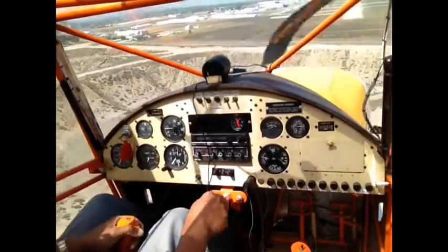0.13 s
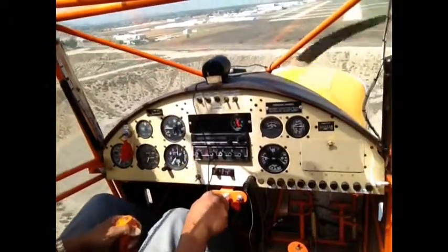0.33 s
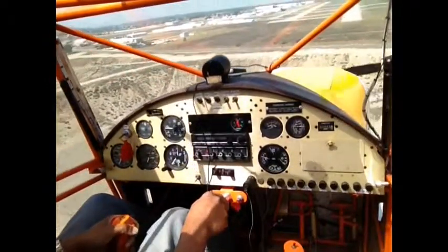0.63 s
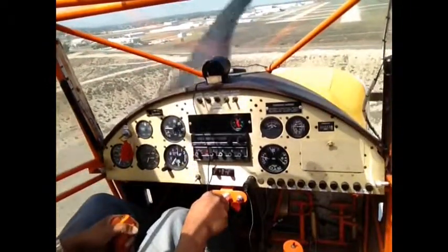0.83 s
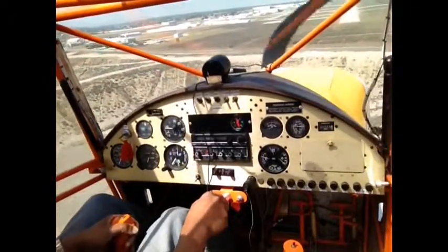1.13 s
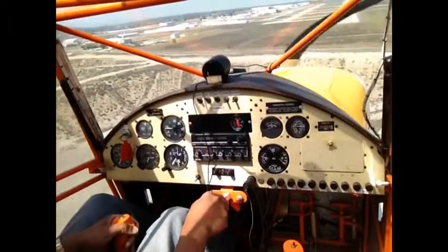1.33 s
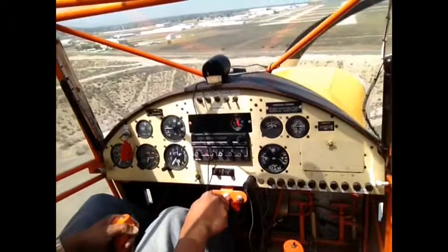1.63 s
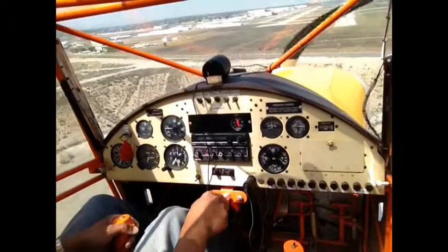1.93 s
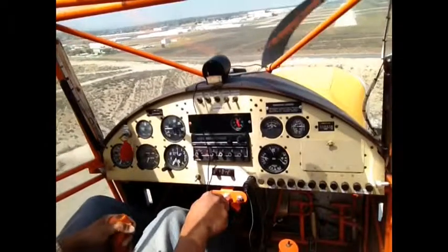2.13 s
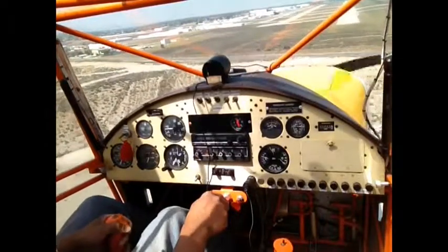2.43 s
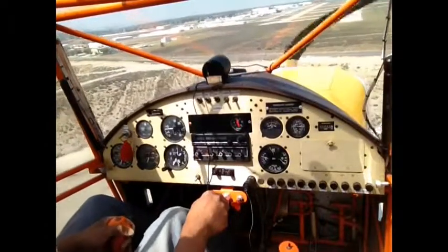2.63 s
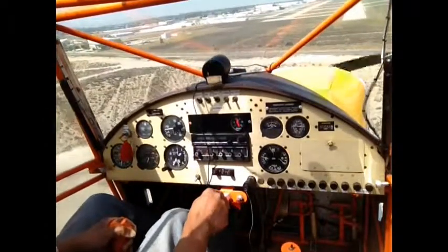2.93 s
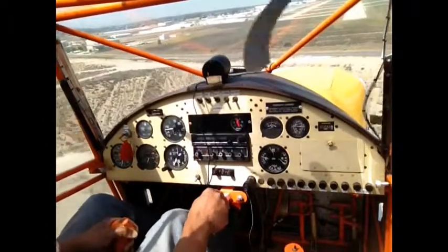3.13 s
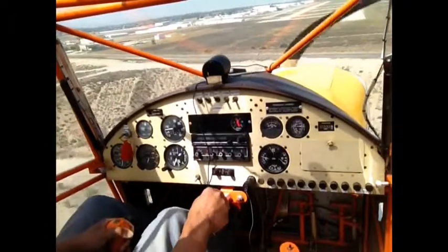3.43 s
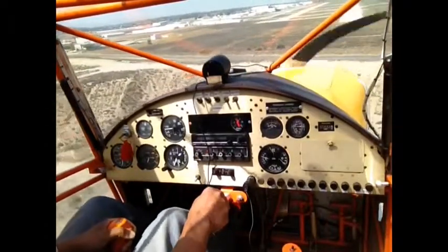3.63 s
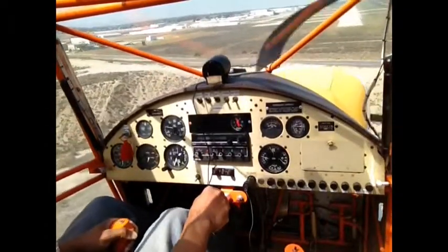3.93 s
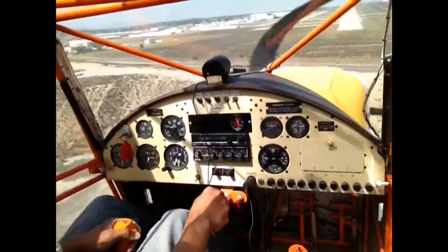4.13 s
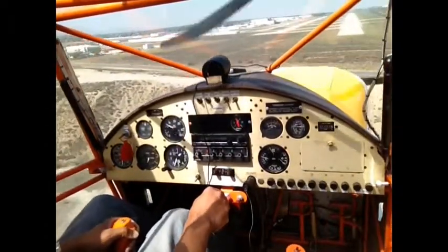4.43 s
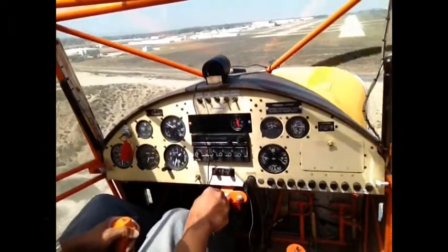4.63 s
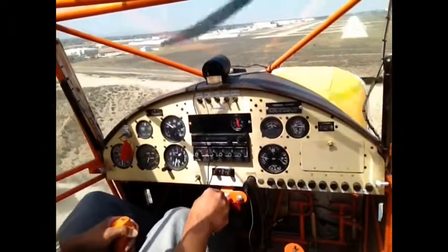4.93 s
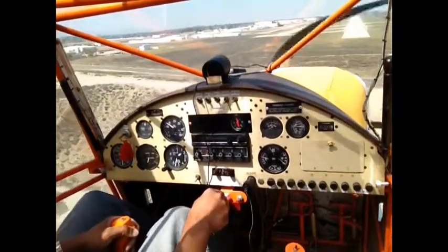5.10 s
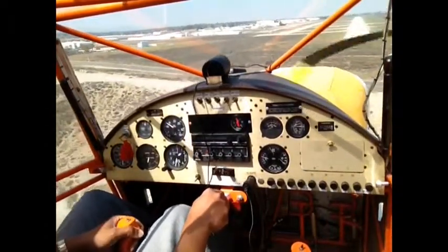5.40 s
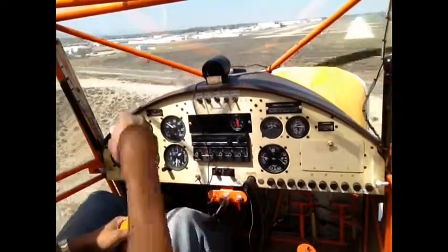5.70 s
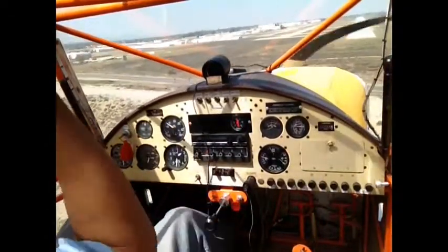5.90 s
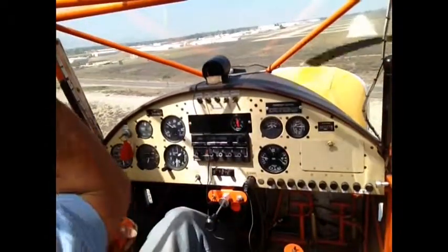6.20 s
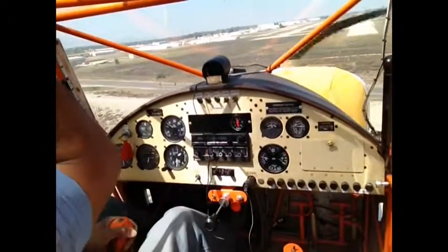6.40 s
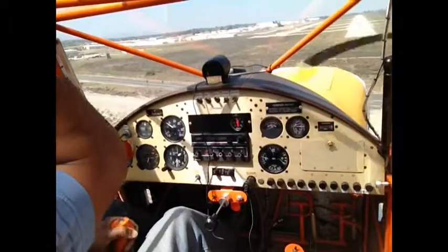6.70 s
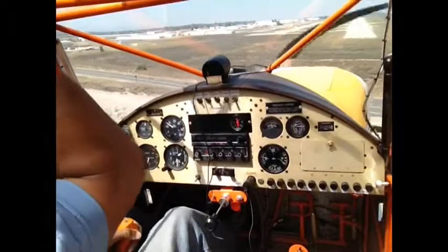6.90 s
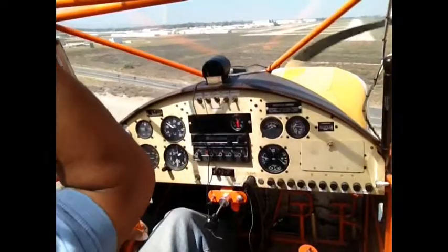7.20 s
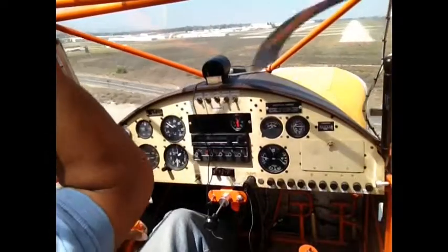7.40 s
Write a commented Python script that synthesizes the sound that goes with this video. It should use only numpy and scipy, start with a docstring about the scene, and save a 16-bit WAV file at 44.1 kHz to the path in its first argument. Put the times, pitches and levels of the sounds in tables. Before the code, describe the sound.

Inside a small propeller plane on approach, uneven idle and rushing air give way to higher engine drone, choppy dropouts and hard slapping knocks.

```python
"""Light aircraft cockpit on approach

The engine idles, then picks up to low power; firing tones (sines) and exhaust roar (pulsed noise) follow the shaft.
Air past the cabin (coloured noise) makes panels boom and hiss; wandering narrow bands whistle and sing.
Under power the propeller wash rumbles on the microphone. The sound drops out briefly, mostly under power;
short pulses with bright noise bursts slap, twice in a cluster that knocks, and the recorder's low cut rings after each.
"""
import sys
import numpy as np
from scipy import signal
from scipy.fft import rfft, irfft, next_fast_len
from scipy.io import wavfile
from scipy.ndimage import map_coordinates

SR = 44100
rng = np.random.default_rng(int(sys.argv[2]) if len(sys.argv) > 2 else 0)


def unload_audio(sound):
    """Save the sound as a 16-bit wav file, at the path given as the first command line argument."""
    columns = np.transpose(np.atleast_2d(sound))
    # keep every value between -1 and 1, then stretch to whole-number steps
    steps = np.round(np.clip(columns, -1, 1) * 32767)
    wavfile.write(sys.argv[1], SR, steps.astype(np.int16))


N = 332955

# Engine speed: time_s, shaft_turns_per_s
SPEED = [(0, 30.6), (.75, 31.3), (2, 29.3), (2.6, 27.6), (3.5, 27.7), (3.9, 36.5), (4.25, 41.7),
         (4.55, 43.5), (5.1, 44.3), (5.7, 43.7), (7.1, 43.8), (7.55, 43.4)]
# Engine tones; half orders since a four-stroke cycle lasts two turns:
# shaft_rate_multiple, idle_level_db, power_level_db (re FIRING)
ORDERS = [(2, -8, 0.5), (2.5, -41, -5.5), (3, 5.5, 0.5), (3.5, -17, -20.5), (4, -5.5, -27), (4.5, -6, -14),
          (5, -11.5, -23)]
# Engine tone strength, uneven at idle, firm under power: time_s, level_db
FIRING = [(0, -36), (.35, -32.5), (.5, -37), (.88, -43), (1.1, -32.5), (1.5, -33.5), (1.68, -28.5),
          (1.9, -35), (2.6, -34), (3.0, -37.5), (3.5, -33.5), (3.75, -35.5), (4.1, -28.5), (4.6, -24.5),
          (5.05, -25), (5.7, -25.5), (6.6, -26), (7.0, -23.5), (7.25, -24), (7.55, -27.5)]
# Exhaust roar spectrum: freq_hz, density_db
EXHAUST = [(60, -46), (100, -10.5), (122, 1), (150, -2), (190, -3), (228, -4.5), (280, -16.5), (340, -12.5),
           (450, -32), (900, -68)]
# Low roar swells: centre_s, half_length_s, gain_db
SWELLS = [(0.388, .05, 5), (.62, 0.24, 5.5), (1.3, .11, 6), (1.518, 0.057, 4.5), (1.806, .08, 5),
          (2.035, .04, 4), (2.23, 0.044, 11.5), (2.78, 0.065, 6.5), (3.97, 0.056, 4), (4.25, .04, 1.5),
          (4.443, 0.081, 2.5), (4.593, .05, 3), (4.812, 0.014, 7.5), (4.86, 0.011, 4), (4.93, 0.023, 5),
          (5.02, 0.019, 2), (5.113, .015, 3.5), (5.19, .03, 2), (5.303, .025, 5.5), (5.477, 0.03, 7),
          (5.697, .03, 1), (6.83, .025, 1), (7.055, 0.023, 4), (7.275, 0.018, 7.5), (7.393, 0.018, 2),
          (7.45, 0.028, 4.5)]
# Airflow strength past the cabin: time_s, level_db
AIRFLOW = [(0, -47), (0.65, -47), (1.6, -48.5), (2.2, -48.5), (3.0, -49.5), (3.75, -48.5), (4.5, -47),
           (4.8, -46.5), (4.93, -46.5), (5.03, -46.5), (5.7, -48), (7.55, -47.5)]
# Cabin noise spectra, frame rumble, panel boom, air rush, hiss: freq_hz, density_db
AIRFRAME = [(20, -22), (40, 4.5), (62, -5), (85, 2), (115, -2), (160, -8), (230, -25.5), (500, -52)]
BOOM = [(150, -7), (270, -7.5), (335, -1.5), (410, -4), (465, 1), (500, -0.5), (550, -4), (630, -9),
        (730, -10), (830, -16), (1000, -18.5), (1400, -35.5), (3000, -75)]
RUSH = [(500, -25), (950, -0.5), (1250, 0.5), (1550, 1.5), (1800, -1), (2050, -1.5), (2350, -5),
        (2650, -3.5), (2950, -7.5), (3400, -10.5), (4000, -15), (4500, -20), (7000, -48)]
HISS = [(2240, -47), (3800, -1.5), (4140, -1.5), (4320, -6.5), (4930, 0), (6110, -3), (8300, 0),
        (9100, -0.5), (10800, 3), (13400, -4.5), (15200, -12)]
# Narrow cabin rings: idle_hz, power_hz, width_hz, idle_level_db, power_level_db (re airflow)
RINGS = [(499, 490, 42, 4.5, -0.5), (628, 620, 70, -1.5, -8)]
# Thin air whistle around the cabin: time_s, pitch_hz, level_db
WHISTLE = [(0, 2680, -62), (.25, 2630, -56), (.75, 2636, -55.5), (1.1, 2620, -59), (1.5, 2640, -68),
           (1.95, 2660, -69), (2.2, 2666, -59), (3.0, 2685, -64), (3.45, 2680, -65), (3.7, 2670, -61),
           (4.0, 2650, -65), (4.5, 2645, -58.5), (5.2, 2624, -58), (6.05, 2624, -68), (7.55, 2645, -63)]
# Lower, broader airflow ring: time_s, level_db
SING = [(0, -64), (.65, -53), (1.1, -58), (1.45, -56), (1.7, -66), (2.3, -57), (2.6, -58), (3.9, -60),
        (4.45, -57), (5.4, -64), (6.2, -53), (6.7, -58), (7.55, -64)]
# Wash rumble spectrum: freq_hz, density_db
WASH = [(130, 2), (200, -3), (250, 2.5), (340, -7.5), (450, -13.5), (600, -15.5), (800, -19.5), (1500, -32),
        (3000, -87)]
# Wash strength on the microphone: time_s, level_db (re WASH_DB)
WASH_LEVEL = [(3.85, -10), (3.97, 5), (4.22, -12), (4.37, 5), (4.58, 2.5), (4.72, -1), (4.92, -4),
              (5.03, -3), (5.15, 1.5), (5.27, -5.5), (5.5, 0), (5.78, 3), (5.96, -11), (6.09, 4),
              (6.25, -3), (6.55, 0), (6.67, 2.5), (6.82, 4), (7.06, 4.5), (7.16, -12), (7.44, 7.5),
              (7.55, 4)]
# Brief dropouts: centre_s, held_s, gain_db
DROPOUTS = [(.123, 0.011, -11), (.15, 0.0032, -18), (4.547, 0.0072, -13), (4.567, 0.004, -13),
            (4.596, 0.0072, -14), (4.703, 0.0064, -13), (4.748, 0.0065, -9), (4.837, .021, -35),
            (4.869, 0.011, -18), (4.978, 0.013, -10), (5.042, 0.018, -42), (5.074, 0.03, -66),
            (5.136, 0.026, -44), (5.3635, 0.015, -23), (5.478, 0.016, -24), (5.569, 0.018, -29),
            (5.598, 0.015, -36), (6.044, 0.02, -33), (5.336, 0.0077, -14), (5.657, 0.0093, -10),
            (5.747, 0.0087, -12), (5.938, 0.012, -10), (6.183, 0.0084, -9), (6.343, 0.0074, -10),
            (6.36, .003, -10), (6.3905, 0.036, -28), (6.4235, 0.0075, -28), (6.444, .003, -24),
            (6.664, 0.012, -30), (6.779, 0.0132, -29), (6.806, 0.014, -20), (6.863, 0.014, -25),
            (6.889, 0.012, -20), (6.968, 0.036, -23), (7.006, 0.0098, -26), (7.03, .019, -32),
            (7.072, 0.0059, -15), (7.095, 0.013, -30), (7.14, 0.017, -33), (7.256, 0.021, -15.5),
            (7.304, 0.015, -34), (7.36, 0.0098, -23), (7.488, 0.0066, -10), (7.525, 0.018, -39)]
# Slapping pulses, single or in two knocking clusters, before the low cut:
# peak_s, push_full_scale (minus = pull), build_s, release_s, burst_db (re push)
SLAPS = [(5.1228, 0.24, 0.00093, .0005, -30), (5.1973, .22, .0007, 0.0012, -42),
         (5.49, -0.28, 0.0011, 0.0017, -40), (6.3566, 0.52, 0.0022, 0.00071, -42),
         (6.363, -0.44, 0.0006, 0.0012, -33), (6.3681, 0.81, 0.0019, 0.00065, -33),
         (6.3809, -1.33, 0.00056, 0.00085, -27), (6.3893, 0.79, 0.0011, 0.00054, -30),
         (6.3967, -0.69, 0.00047, 0.0018, -28), (6.934, 0.3, 0.00055, 0.0017, -32),
         (6.9496, 0.39, 0.0019, 0.00056, -35), (6.9599, -0.51, 0.00045, 0.0011, -24),
         (6.962, 0.6, 0.00096, 0.00072, -34), (6.9687, -0.97, 0.0006, 0.0011, -32),
         (7.5, 0.034, 0.00055, .0008, -22)]
# Spectrum of the noise burst with each slap: freq_hz, density_db
BURST = [(500, 2), (1400, 13), (2800, 2), (4000, -4), (6000, -14), (15200, -19)]

IDLE_TURNS_PER_S, POWER_TURNS_PER_S = 28, 44
POWER_EXPONENT = 1.2  # power grows a little faster than shaft speed

# Random depths in dB multiply a curve of roughly unit spread; rates are knots per s
UNEVEN_IDLE_DB, UNEVEN_POWER_DB, UNEVEN_PER_S = 2, 0.6, 12  # no two strokes burn alike
ROAR_IDLE_DB, ROAR_POWER_GAIN_DB = -37, 6
SURGE_DB, SURGE_PER_S = 0.1, 5.6
ROAR_FOLLOWS_WASH = 0.24  # dB per dB, at full power

RUSH_DB, BOOM_DB, HISS_DB = -1.0, 11.5, -8  # re airflow
BOOM_FOLLOWS_AIR, HISS_FOLLOWS_AIR = 0.73, 0.75  # dB per dB
BOOM_FOLLOWS_ROAR = 0.16  # dB per dB, at full power

RINGS_FOLLOW_AIR = 0.72  # dB per dB
SING_HZ, SING_WIDTH_HZ, WHISTLE_WIDTH_HZ = 1782, 270, 180
DRIFT_SHARE = 0.003  # stray from centre, as a share of pitch

WASH_DB, LUMP_DB, LUMP_PER_S = -34.5, 5.5, 80
HEAVE_DB, HEAVE_PER_S = -20.5, 45  # slow pressure swings at full power

FALL_S, RECOVER_S = 0.00081, 0.00019  # dropout edge times
DIPS_PER_S, DIP_MEAN_S, DIP_MEAN_DB = 4, 0.0041, -8  # mean gain change at full power

SLAP_ROUNDNESS = 1.68  # 1 = pointed pulse, 2 = bell
BURST_DECAY_S = 0.0015


def amp(db):
    """Decibels to gain."""
    return 10 ** (np.asarray(db) / 20)


def unit(x):
    """x at rms 1."""
    return x / np.sqrt(np.mean(x ** 2) + 1e-20)


def curves(rows):
    """One value per sample for each column after the time."""
    time_s, *columns = np.transpose(rows)
    return [np.interp(np.arange(N) / SR, time_s, column) for column in columns]


def wobble(knots_per_s):
    """Smooth random curve through normal-distributed knots."""
    knots = rng.standard_normal(int(N * knots_per_s / SR) + 4)
    return map_coordinates(knots, [np.arange(N) * knots_per_s / SR])


def filtered(x, response):
    """x times a complex response of frequency."""
    size = next_fast_len(N + SR // 2)
    freq_hz = np.fft.rfftfreq(size, 1 / SR)
    return irfft(rfft(x, size) * response(freq_hz), size)[:N]


def noise(spectrum, drive=1):
    """Noise of rms 1, its strength following drive, coloured by (freq_hz, density_db) points."""
    freq_hz, density_db = np.transpose(spectrum)

    def colour(hz):
        return amp(np.interp(np.log(hz + 1), np.log(freq_hz), density_db, left=-120, right=-120))

    return unit(filtered(drive * rng.standard_normal(N), colour))


def roar_swells():
    """Gain in dB of the low roar: a sum of bell-shaped swells."""
    t = np.arange(N) / SR
    return sum(gain_db * np.exp(-((t - centre_s) / half_s) ** 2) for centre_s, half_s, gain_db in SWELLS)


def engine(turns, power, wash_db, roar_swell_db):
    """Propeller and firing tones locked to the shaft, and exhaust roar puffing with every firing."""
    tones = np.zeros(N)
    for order, idle_db, power_db in ORDERS:
        uneven_db = (UNEVEN_IDLE_DB * (1 - power) + UNEVEN_POWER_DB * power) * wobble(UNEVEN_PER_S)
        phase = 2 * np.pi * (order * turns + rng.random()) + 0.056 * wobble(8.4)
        level_db = idle_db + power * (power_db - idle_db)
        tones += np.sqrt(2) * amp(level_db) * amp(uneven_db) * np.sin(phase)
    # three firings a turn, plus a once-a-turn throb
    puffs = amp(2.0 * np.cos(2 * np.pi * 3 * turns) + 4.3 * np.cos(2 * np.pi * turns))
    roar = noise(EXHAUST, puffs * amp(SURGE_DB * wobble(SURGE_PER_S)))
    firing_db, = curves(FIRING)
    swell_db = roar_swell_db + ROAR_FOLLOWS_WASH * power * wash_db
    roar_db = ROAR_IDLE_DB + ROAR_POWER_GAIN_DB * power + swell_db
    return amp(firing_db) * tones + amp(roar_db) * roar


def cabin(turns, power, air_db, roar_swell_db):
    """Frame rumble, panel boom, and air rushing and hissing past the glazing; all but the frame throb once a turn."""
    throb = np.cos(2 * np.pi * turns)
    mean_db = np.mean(air_db)
    swell_db = air_db - mean_db
    frame = amp(-27.0 + 3.0 * power) * noise(AIRFRAME)
    boom_db = mean_db + BOOM_DB + BOOM_FOLLOWS_AIR * swell_db + BOOM_FOLLOWS_ROAR * power * roar_swell_db
    boom = amp(boom_db) * noise(BOOM, amp(0.3 * throb + 1.04 * wobble(16)))
    rush = amp(air_db + RUSH_DB) * noise(RUSH, amp(1.0 * throb + 0.53 * wobble(25)))
    hiss_db = mean_db + HISS_DB + HISS_FOLLOWS_AIR * swell_db + 0.5 * power
    hiss = amp(hiss_db) * noise(HISS, amp(0.6 * throb))
    return frame + boom + rush + hiss


def narrow(centre_hz, width_hz):
    """Fuzzy tone of rms 1 wandering around its centre: a carrier modulated by two slow noises."""
    phase = 2 * np.pi * np.cumsum(centre_hz * (1 + DRIFT_SHARE * wobble(3))) / SR
    return unit(wobble(width_hz) * np.cos(phase) + wobble(width_hz) * np.sin(phase))


def rings(power, air_db):
    """Airflow whistles and sings; two cabin rings swell with it and sink in pitch as power comes up."""
    whistle_hz, whistle_db = curves(WHISTLE)
    sing_db, = curves(SING)
    out = amp(whistle_db + 0.54 * wobble(8.6)) * narrow(whistle_hz, WHISTLE_WIDTH_HZ)
    out += amp(sing_db) * narrow(SING_HZ, SING_WIDTH_HZ)
    mean_db = np.mean(air_db)
    drive_db = mean_db + RINGS_FOLLOW_AIR * (air_db - mean_db)
    for idle_hz, power_hz, width_hz, idle_db, power_db in RINGS:
        band = narrow(idle_hz + power * (power_hz - idle_hz), width_hz)
        out += amp(drive_db + idle_db + power * (power_db - idle_db)) * band
    return out


def buffeting(power, wash_db):
    """Wash on the microphone: lumpy rumble over pressure swings too slow to hear, scaled by power."""
    rumble = noise(WASH, amp(LUMP_DB * np.tanh(wobble(LUMP_PER_S))))
    heave = amp(HEAVE_DB) * wobble(HEAVE_PER_S)
    return power * (amp(WASH_DB + wash_db) * rumble + heave)


def dropout_gain(power, dip_count=100):
    """Gain that drops briefly at each dropout, with random, mostly shallower dips under power."""
    t = np.arange(N) / SR
    draws = rng.random((dip_count, 3))
    dip_times_s = np.cumsum(-np.log(1 - draws[:, 0])) / DIPS_PER_S
    dips = []
    for centre_s, (_, length_draw, depth_draw) in zip(dip_times_s, draws):
        if centre_s < t[-1]:
            held_s = DIP_MEAN_S * (.5 + length_draw)
            depth_db = DIP_MEAN_DB * (.5 + depth_draw) * power[int(centre_s * SR)] ** 2
            dips.append((centre_s, held_s, depth_db))
    gain_db = np.zeros(N)
    for centre_s, held_s, depth_db in list(DROPOUTS) + dips:
        near = slice(max(0, int((centre_s - .04) * SR)), int((centre_s + .04) * SR))
        u = t[near] - centre_s
        fall = .5 * (1 + np.tanh((u + held_s / 2) / FALL_S))
        recover = .5 * (1 - np.tanh((u - held_s / 2) / RECOVER_S))
        gain_db[near] = np.minimum(gain_db[near], depth_db * fall * recover)  # deepest wins
    return amp(gain_db)


def knocks():
    """Each slap is a short push or pull of pressure with a short decaying burst of bright noise."""
    pushes, bursts = np.zeros(N), np.zeros(N)
    half = SR // 100
    u = np.arange(-half, half) / SR
    for peak_s, push, build_s, release_s, burst_db in SLAPS:
        start = round(peak_s * SR) - half
        side_s = np.where(u < 0, build_s, release_s)
        pushes[start:][:len(u)] += push * np.exp(-np.abs(u / side_s) ** SLAP_ROUNDNESS)
        age_s = u + build_s  # the burst starts at once as the slap builds
        decay = (age_s > 0) * np.exp(-np.abs(age_s) / BURST_DECAY_S)
        bursts[start:][:len(u)] += abs(push) * amp(burst_db) * decay
    return pushes + bursts * noise(BURST)


def scene():
    """Microphone signal: shaft speed drives tones, roar, throb and wash; airflow drives the cabin."""
    turns_per_s, = curves(SPEED)
    air_db, = curves(AIRFLOW)
    wash_db, = curves(WASH_LEVEL)
    turns = np.cumsum(turns_per_s) / SR
    speed_share = (turns_per_s - IDLE_TURNS_PER_S) / (POWER_TURNS_PER_S - IDLE_TURNS_PER_S)
    power = np.clip(speed_share, 0, 1) ** POWER_EXPONENT
    roar_swell_db = roar_swells()
    drone = engine(turns, power, wash_db, roar_swell_db)
    drone += cabin(turns, power, air_db, roar_swell_db)
    drone += rings(power, air_db)
    gated = (drone + buffeting(power, wash_db)) * dropout_gain(power)
    return (gated + knocks())[None]


def record(dry, cut_hz=157, cut_q=1.51, coupling_hz=75, top_hz=15300):
    """A resonant low cut removes slow pressure and rings after sudden changes; a steep low-pass ends the band."""
    def low_cut(hz):
        return -hz ** 2 / (cut_hz ** 2 - hz ** 2 + 1j * hz * cut_hz / cut_q)

    def coupling(hz):
        return 1j * hz / (coupling_hz + 1j * hz)

    thinned = filtered(dry[0], lambda hz: low_cut(hz) * coupling(hz))
    band_limit = signal.ellip(12, .1, 90, top_hz, fs=SR, output="sos")
    return signal.sosfilt(band_limit, thinned)[None]


dry = scene()
out = record(dry)
unload_audio(out)
```